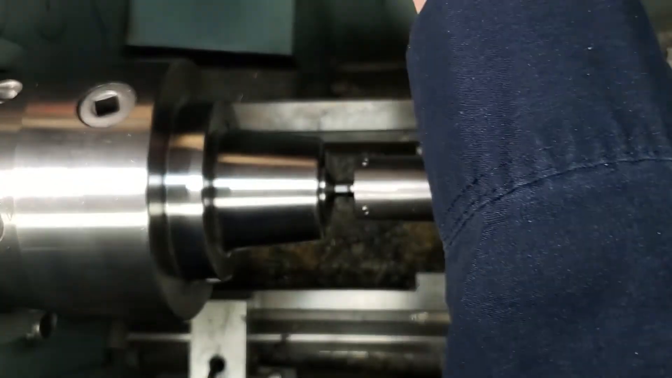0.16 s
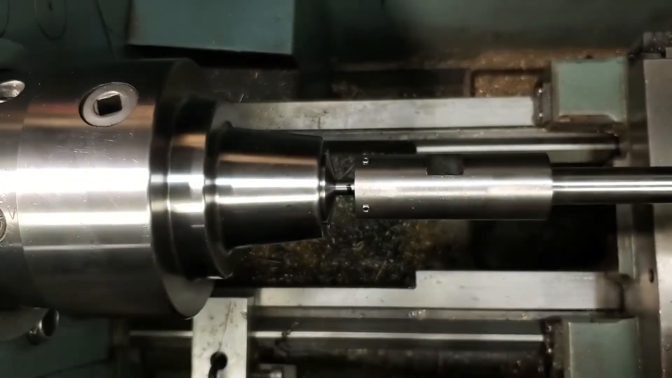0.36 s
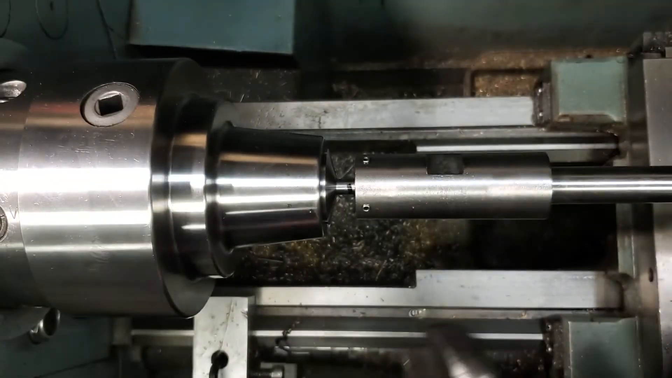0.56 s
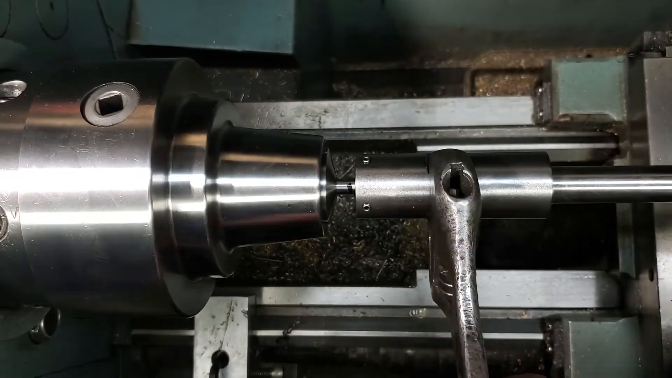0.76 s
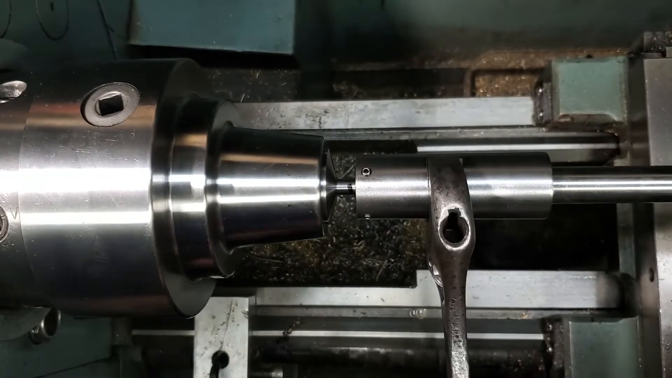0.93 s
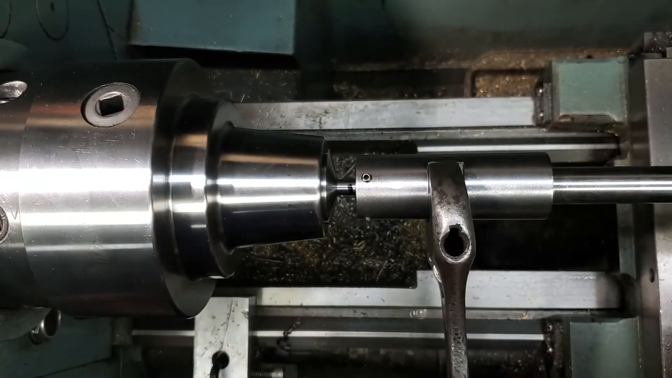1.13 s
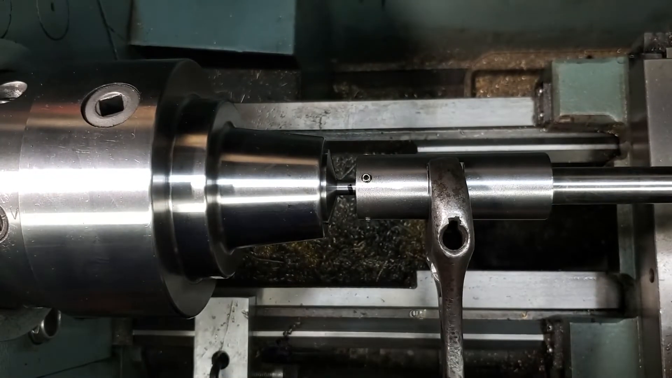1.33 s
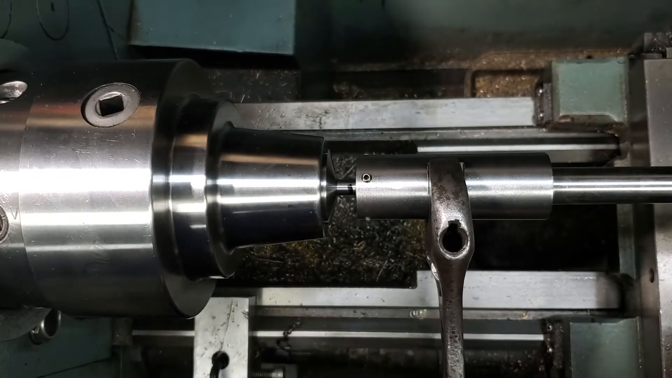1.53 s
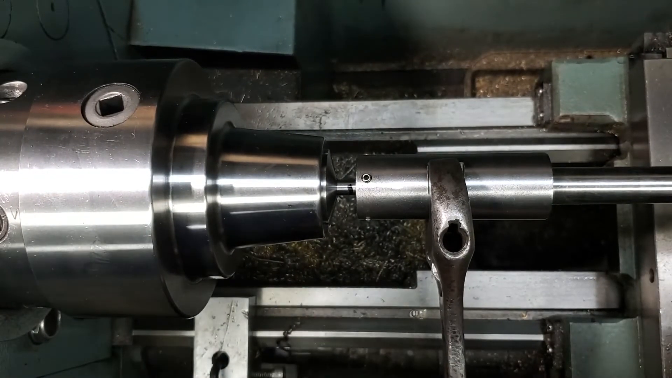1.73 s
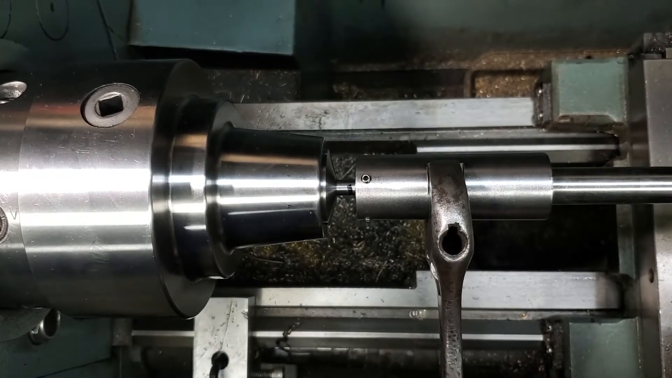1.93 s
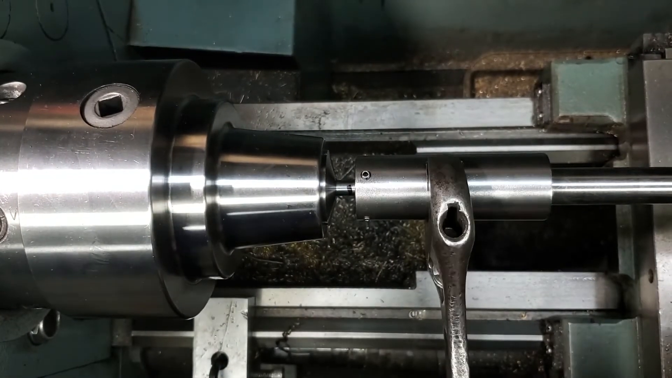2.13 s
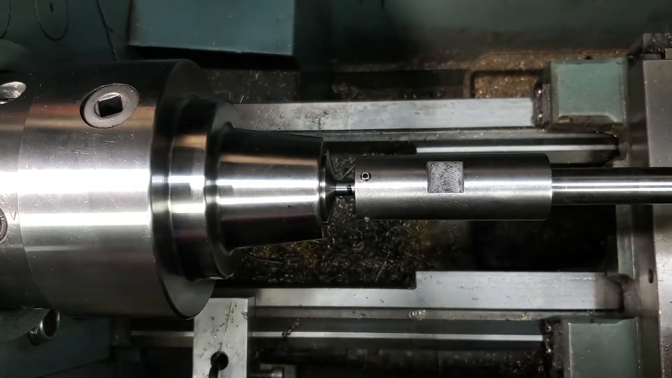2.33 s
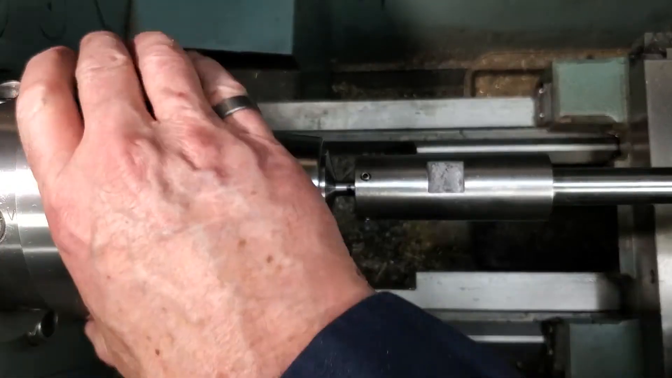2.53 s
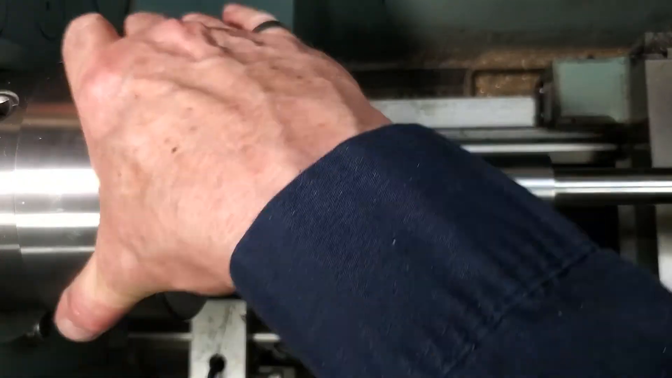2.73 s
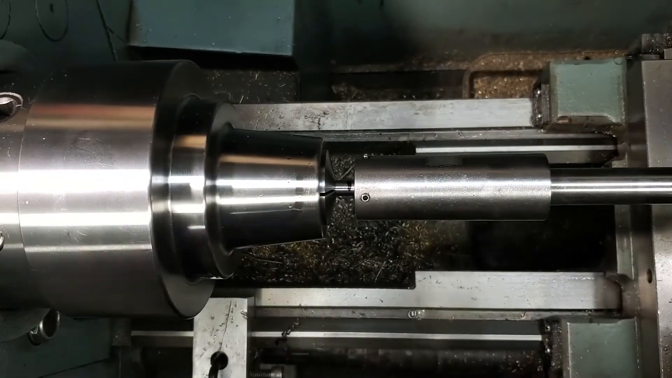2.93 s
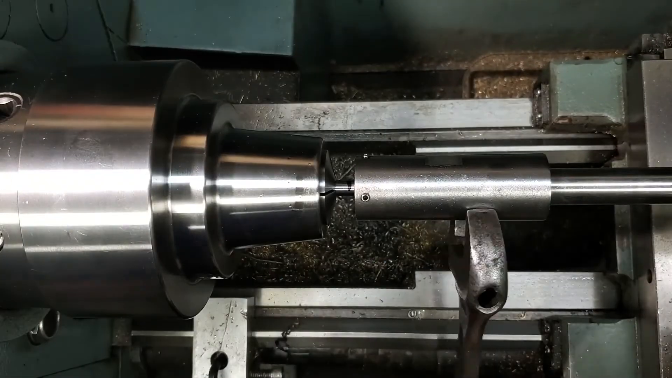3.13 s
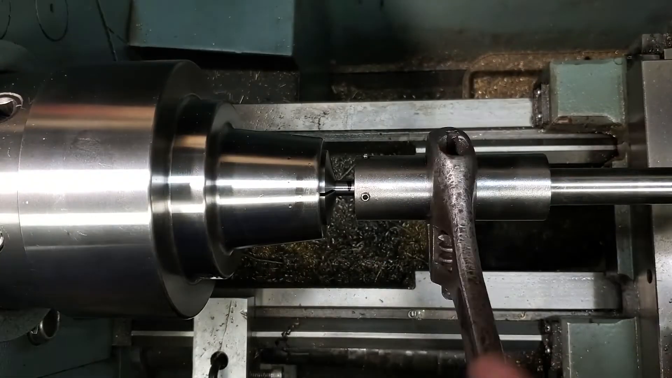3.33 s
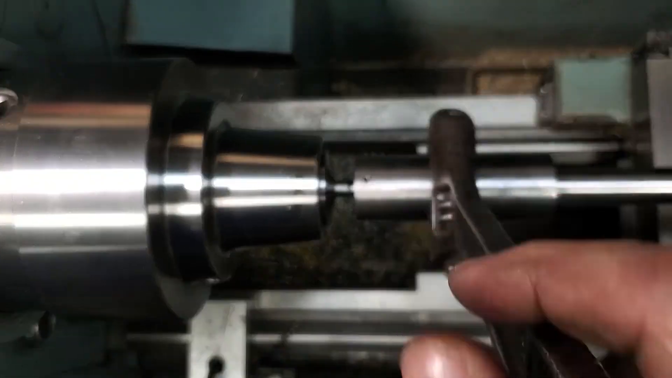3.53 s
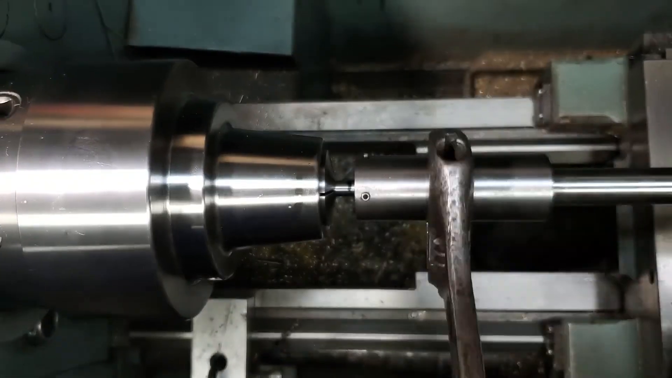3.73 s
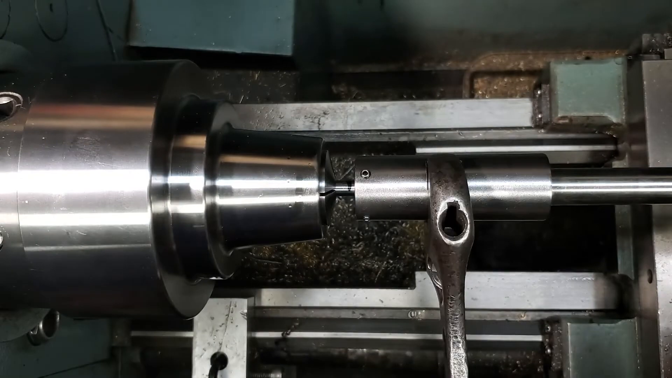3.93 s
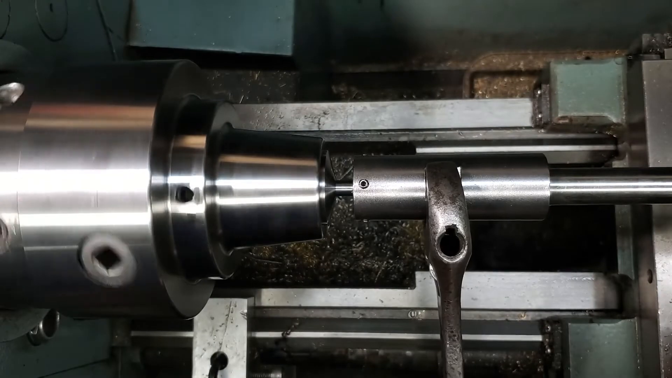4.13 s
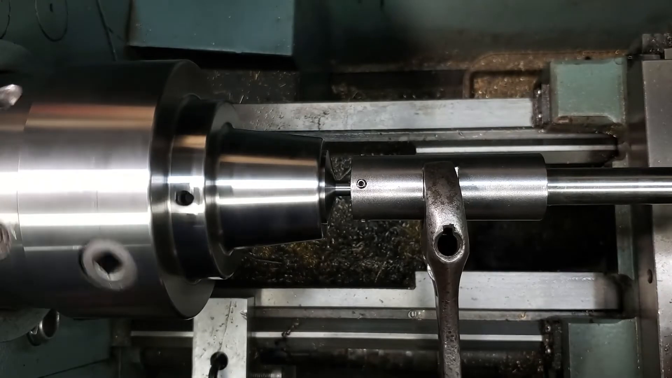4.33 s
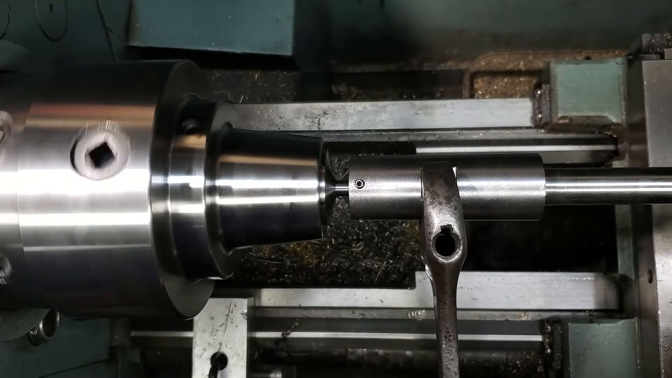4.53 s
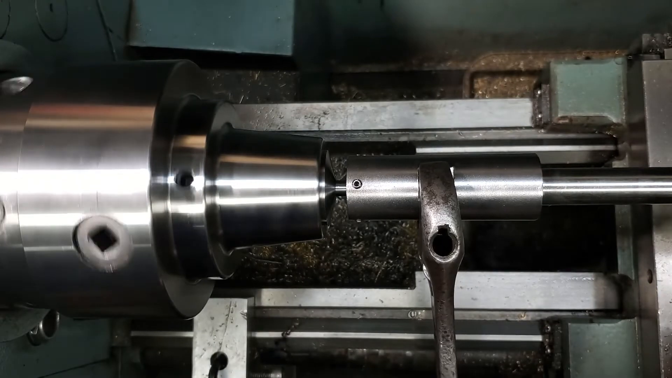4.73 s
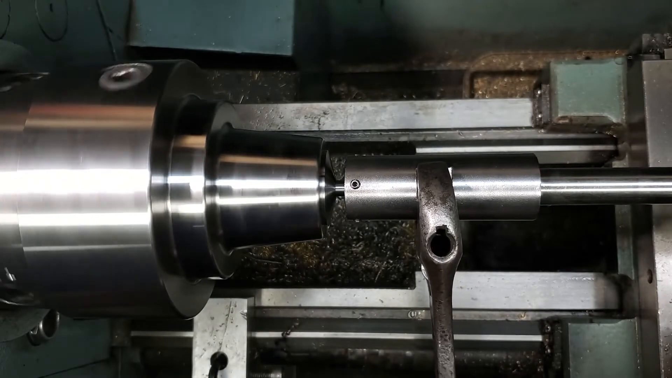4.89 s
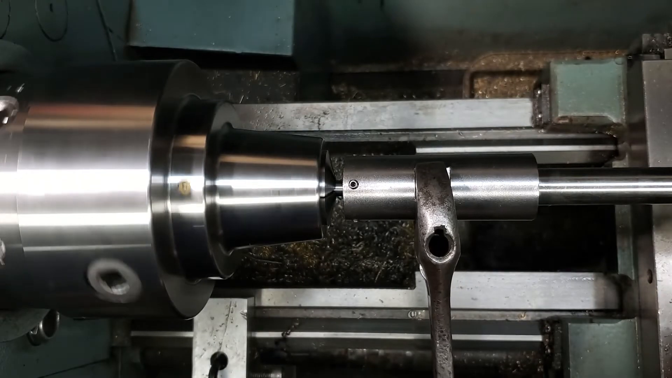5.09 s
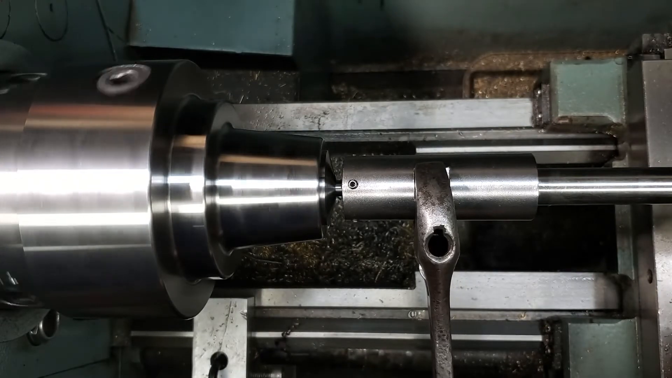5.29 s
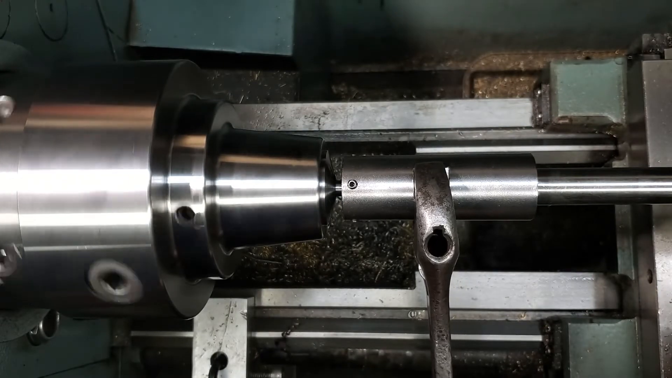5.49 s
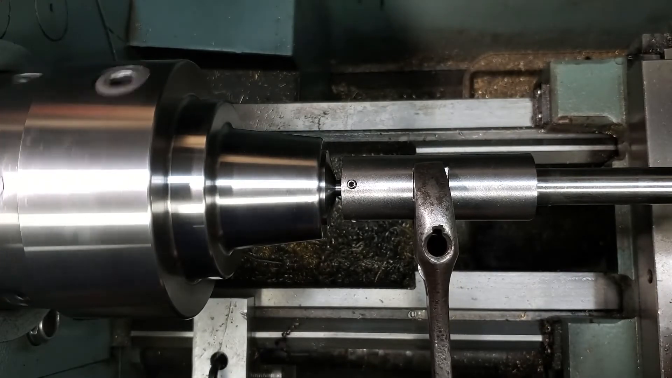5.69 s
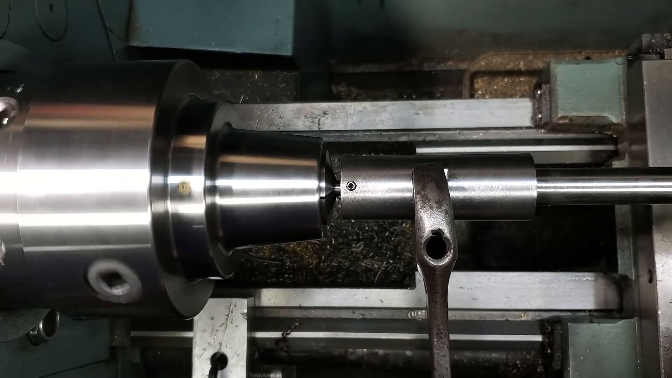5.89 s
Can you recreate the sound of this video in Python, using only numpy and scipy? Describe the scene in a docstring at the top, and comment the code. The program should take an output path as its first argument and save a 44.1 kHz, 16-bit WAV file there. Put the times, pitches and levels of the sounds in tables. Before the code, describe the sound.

In a quiet workshop, close above a metal lathe, a palm thumps the chuck, steel ticks and a wrench clinks. Levers clunk, gears knock and briefly rumble. More wrench rattles follow, then a double heavy clunk engages the drive, which spins up quickly into steady hum, gear churn and faint whine, with crackling chips. Close stereo, short room echo.

```python
"""Idling gears rub and a palm thumps the chuck of a metal lathe, heard from just above it in a workshop.
The chuck is rocked by hand, levers clunk, a wrench clinks: filtered noise bursts with decaying modes.
Then the motor is switched in: it hums in steady tones, gears whine in wavering tones and churn in noise.
The spindle spins up, layer levels following its slip, and the die's teeth crackle as they bite."""
import sys
import numpy as np
from scipy import signal
from scipy.fft import rfft, irfft
from scipy.io import wavfile
from scipy.ndimage import uniform_filter1d

SR = 44100
rng = np.random.default_rng(int(sys.argv[2]) if len(sys.argv) > 2 else 0)


def transcribe(u):
    """Save the signal u as a 16-bit wav file named by the first command-line argument.

    u: samples, shape (n,) or (channels, n), limited to [-1, 1]; the rate is SR.
    q: integer samples, one column per channel.
    """
    v = np.clip(np.atleast_2d(u).T, -1, 1)
    q = np.round(v * 32767).astype(np.int16)
    wavfile.write(sys.argv[1], SR, q)


N = 262395
TIME = np.arange(N) / SR
STROKE_ATTACK_S = 0.023
# the clutch bites, and the slip then decays with the spin-up time constant
CLUTCH_S, SPIN_UP_S = 4.18, 0.28

# resemblance of the two microphones: (frequency [Hz], left-right correlation [-1 to 1])
LIKENESS = [(60, 0.41), (290, 0.18), (640, 0.21), (1400, -0.18), (3100, 0.032), (15000, 0.039)]
# corners of a blow's tilt, from bass to treble: (frequency [Hz], ...)
ZONES_HZ = (200, 1000, 3500, 11000)
# gears rolling on after a jolt until friction stops them:
# (start [s], length [s], relative rumble level [dB], extra scrape level [dB])
COASTS = [(0.0, 0.21, -55, -6.5), (1.292, 0.52, -38, 0.5), (2.075, 0.28, -48.5, 1), (2.746, 0.2, -46.5, -6),
          (3.488, 0.17, -55.5, -20), (3.991, 0.39, -33.5, 0.5)]
# steady motor hum: (frequency [Hz], relative left level [dB], relative right level [dB])
HUM = [(120, -38, -35), (240, -39, -38), (360, -54, -52), (480, -53, -43), (720, -54, -40), (840, -38, -50)]


def amp(db):
    """Level in decibels as an amplitude ratio."""
    return 10 ** (np.asarray(db) / 20)


def unit(x):
    """Normalisation to an rms of 1."""
    return x / np.sqrt(np.mean(x ** 2) + 1e-20)


def read(points, hz):
    """A spectrum, joined by straight lines over log frequency."""
    f, value = np.transpose(points)
    return np.interp(np.log(hz + 1), np.log(f + 1), value)


def add(mix, s, sound):
    """Superposition: a sound is summed into the mix from time s."""
    part = mix[:, max(round(s * SR), 0):][:, :sound.shape[1]]
    part += sound[:, :part.shape[1]]


def bins(size):
    """Frequencies of the discrete Fourier transform."""
    return np.fft.rfftfreq(size, 1 / SR)


def bands(hz, centres):
    """Partition of the spectrum into overlapping bands that sum to one."""
    return np.array([read(list(zip(centres, row)), hz) for row in np.eye(len(centres))])


def pair(hz):
    """Partly coherent random spectra at two microphones, most alike in the bass."""
    a, b = rng.standard_normal((2, len(hz))) + 1j * rng.standard_normal((2, len(hz)))
    same = np.clip(read(LIKENESS, hz), -1, 1)
    return np.array([a, same * a + np.sqrt(1 - same ** 2) * b])


def noise(colour, peaks=(), weight=1):
    """Coloured stereo noise of rms 1, with resonant peaks (frequency [Hz], width [Hz], height [dB])."""
    hz = bins(2 * (N // 2 + 1))
    db = read(colour, hz)
    for f, width, height in peaks:
        db = db + height / (1 + (2 * (hz - f) / width) ** 2)
    return unit(irfft(pair(hz) * amp(db) * weight)[:, :N])


def wander(rate):
    """Slow random modulation of rms 1, with rate knots a second."""
    knots = rng.standard_normal(4096)
    return unit(np.interp(TIME * rate, np.arange(len(knots)), knots))


def lines(table, drift_hz, drift_rate, flutter_db):
    """Frequency and amplitude modulation of steady tones, with a phase lag between the microphones."""
    out = np.zeros((2, N))
    for hz, left_db, right_db in table:
        turns = np.cumsum(hz + drift_hz * wander(drift_rate)) / SR + rng.random()
        lag = np.arccos(np.clip(read(LIKENESS, hz), -1, 1)) * np.array([[0], [1]])
        tone = np.sqrt(2) * np.sin(2 * np.pi * turns + lag)
        out += amp([[left_db], [right_db]]) * tone * amp(flutter_db * wander(12))
    return out


def blow(s, db, hard_db, bass_db, ping_db=0):
    """Impact spectrum: hard contact tilts the treble up, weight adds bass, a loose part pings between."""
    return s, db, list(zip(ZONES_HZ, (bass_db, 0, hard_db / 2 + ping_db, hard_db)))


def blows(rows, colour, modes, contact_s, t60, pan_db, ring_db, damping, grit, ripple_db, detune=0.019):
    """Modal impact: parts chatter briefly as they meet; dense modes die fast and a few ring on."""
    out, size = np.zeros((2, N)), 2 ** 14
    t, hz, centres = np.arange(size) / SR, bins(size), np.geomspace(70, 15000, 14)
    split = bands(hz, centres)[:, None]
    knots = np.linspace(0, np.sqrt(SR / 2), 128) ** 2
    # the bass bends round to both microphones
    treble = np.minimum(hz / ZONES_HZ[1], 1)
    sides = unit(amp([[pan_db / 2], [-pan_db / 2]])) ** treble
    # heavy parts start and stop later; the faces graze before they seat
    slow = (centres[:, None, None] / ZONES_HZ[1]) ** -damping
    rise = contact_s * (1 + slow)
    swell = np.minimum(t / rise, 1) ** 3 * amp(-60 * np.maximum(t - rise, 0) / (t60 * slow))
    mode_rise = 2 * contact_s
    for s, db, tilt in rows:
        # each point of contact favours other high modes
        ripple = np.interp(hz, knots, 2 * rng.random(len(knots)) - 1) * treble
        shape = split * sides * amp(read(colour, hz) + read(tilt, hz) + ripple_db * ripple)
        # the bouncing settles as the blow dies
        bounces = np.interp(t, t[::64], rng.standard_normal(size // 64))
        chatter = amp(grit * bounces * np.exp(-t / t60))
        body = irfft(pair(hz) * shape) * swell * chatter
        # each band keeps the energy its colour asks for
        body *= np.sqrt((shape ** 2).mean(2, keepdims=True) / (body ** 2).sum(2, keepdims=True))
        sound = body.sum(0)
        chances = 2 * rng.random((len(modes), 3)) - 1
        for (f, mode_db, life), (off, left, right) in zip(modes, chances):
            decay = amp(-60 * np.maximum(t - mode_rise, 0) / life)
            fade = np.minimum(t / mode_rise, 1) ** 3 * decay
            # low modes reach both microphones in step
            apart = min(f / ZONES_HZ[1], 1) * right
            phase = np.pi * np.array([[left], [left + apart]])
            tone = np.sin(2 * np.pi * f * (1 + detune * off) * t + phase)
            gain = amp(ring_db + mode_db + read(tilt, f)) * sides[:, [np.searchsorted(hz, f)]]
            sound += gain * 2 * tone * fade / fade.sum()
        add(out, s - contact_s, amp(db) * sound)
    return out


def still_air():
    """Stationary background noise: the still workshop air."""
    # colour of the workshop air: (frequency [Hz], relative level [dB])
    air_colour = [(15, -34), (25, -1), (76, 5.5), (175, -16), (236, -1), (1100, -14), (3250, -19.5),
                  (6210, -26), (14800, -19.5), (16000, -15)]
    return amp(-66.5) * noise(air_colour)


def room(x):
    """Diffuse reverberation by convolution, each band decaying exponentially at its own speed."""
    # reverberation of the workshop: (frequency [Hz], decay by 60 dB [s])
    decays = [(100, 0.17), (300, 0.69), (900, 0.43), (3000, 0.19), (7000, 0.42), (15000, 1)]
    t, (centres, t60) = TIME[:SR], np.transpose(decays)
    parts = irfft(rfft(rng.standard_normal((2, SR))) * bands(bins(SR), centres)[:, None])
    tail = (parts * amp(-60 * t / t60[:, None, None])).sum(0)
    tail *= np.minimum(t / 0.0067, 1)  # onset [s]
    return signal.fftconvolve(x, tail / np.linalg.norm(tail[0]), axes=1)[:, :N]


def rolling(scraping):
    """Friction braking: idling gears, as rumble or scrape, fall evenly to nothing after each jolt."""
    return sum(amp(db + scraping * scrape_db) * np.interp(TIME - s, (0, STROKE_ATTACK_S, length), (0, 1, 0))
               for s, length, db, scrape_db in COASTS)


def strokes(table, release_s=0.03):
    """Contact pressure of rubbing strokes: attack, hold, release."""
    pressure = np.zeros(N)
    for s, length, db in table:
        attack, release = (TIME - s) / STROKE_ATTACK_S, (s + length - TIME) / release_s
        pressure += amp(db) * np.clip(np.minimum(attack, release), 0, 1)
    return pressure


def patchy(x, patch_db):
    """Time-varying filtering: shifting contact favours now one resonance, now another."""
    z = signal.stft(x, nperseg=1024, noverlap=768)[2]
    patches = rng.standard_normal(z.shape[1:])
    for axis in (0, 1):
        patches = uniform_filter1d(patches, size=5, axis=axis)
    return signal.istft(z * amp(patch_db * unit(patches)), nperseg=1024, noverlap=768)[1][:, :N]


def handling(grain_db=1.5, catch_db=2):
    """Friction noise: sliding hand, steel and idling gears catch unevenly and stir the casting."""
    # wrench sliding over steel: (start [s], length [s], relative level [dB])
    slide_times = [(0.68, 0.35, -57.5), (1.0, 0.23, -64), (3.07, 0.21, -61.5), (3.255, 0.079, -45.5)]
    # sleeve and hand brushing past: (start [s], length [s], relative level [dB])
    rustle_times = [(0.28, 0.13, -63), (0.43, 0.14, -66), (1.88, 0.069, -61), (2.05, 0.47, -66.5),
                    (2.88, 0.13, -63), (3.39, 0.16, -72.5), (3.81, 0.059, -63)]
    # spectrum of the rubbing: (frequency [Hz], relative level [dB])
    rub_colour = [(18, -27), (30, -0.5), (86, -0.5), (153, 4.5), (311, -3), (449, 5.5), (569, -2.5),
                  (822, 3.5), (1430, -5.5), (1720, -3.5), (2410, -12), (3060, -12.5), (6550, -25),
                  (16000, -27)]
    # weights of rolling gears, sliding steel and brushing sleeve: (rumble [dB], scrape [dB], hiss [dB])
    coast_db = (0, -10.5, -27)
    slide_db = (0, -1.8, -12)
    rustle_db = (-8.5, -3.2, 0)
    casting_peaks = [(145.4, 14, 12), (240, 25, 3.2), (838, 90, 6.1)]
    out, slide, rustle = np.zeros((2, N)), strokes(slide_times), strokes(rustle_times)
    for k, zone in enumerate(bands(bins(2 * (N // 2 + 1)), (1100, 3000, 7000))):
        pressure = amp(coast_db[k]) * rolling(k > 0)
        pressure += amp(slide_db[k]) * slide + amp(rustle_db[k]) * rustle
        out += pressure * noise(rub_colour, casting_peaks, zone) * amp(catch_db * wander(60))
    return out * amp(grain_db * wander(240))


def palm_thumps():
    """Soft impact: a palm stops the chuck."""
    # blows of the palm: (time [s], strength [dB], hardness [dB], extra bass [dB])
    hits = [(0.135, 27, -2.5, 4.5), (0.151, 25.5, -9, -4)]
    # spectrum of a thump: (frequency [Hz], relative level [dB])
    colour = [(30, -19), (100, -12.5), (190, -15.5), (300, -3.5), (430, -4.5), (600, -12.5), (1100, -25),
              (1900, -24), (3600, -44), (5500, -24), (7000, -37.5), (15500, -38.5)]
    # ringing modes: (frequency [Hz], relative level [dB], decay by 60 dB [s])
    modes = [(299.5, 0.87, 0.022), (394, -2, 0.05)]
    return blows([blow(*row) for row in hits], colour, modes, contact_s=0.0046, t60=0.046,
                 pan_db=-0.5, ring_db=-3.0, damping=0.027, grit=2.5, ripple_db=4.5)


def ring_taps():
    """Light, hard impact: a finger ring meets the chuck and excites high modes."""
    # taps: (time [s], strength [dB], hardness [dB], extra bass [dB])
    hits = [(2.572, 5, 4.5, 1.5), (2.679, 7, -5.5, 21)]
    # spectrum of a tap: (frequency [Hz], relative level [dB])
    colour = [(30, -28), (300, -21), (1500, -20.5), (2600, -26), (3900, -14), (4600, -15.5), (5400, -9),
              (7000, -15.5), (9500, -15), (11800, -20.5), (13300, -4.5), (15500, -10)]
    # modes of the finger ring: (frequency [Hz], relative level [dB], decay by 60 dB [s])
    modes = [(13400, 0.5, 0.027), (12400, 1.5, .03), (14300, -7.5, .03), (15140, -4, .03)]
    return blows([blow(*row) for row in hits], colour, modes, contact_s=0.0028, t60=0.055,
                 pan_db=2.5, ring_db=0.5, damping=.05, grit=1.7, ripple_db=2.5)


def steel_ticks(bass_db=-4.5):
    """Hard impact: small steel contacts make the die holder ring."""
    # contacts: (time [s], strength [dB], hardness [dB], ping [dB])
    hits = [(0.029, -3, -8, -0.5), (0.124, 8, -4.5, -11.5), (0.346, -10.5, -6, -1.5),
            (0.542, -15.5, 7.5, 8), (0.717, 13.5, 3, 2.5), (0.957, 1, -1.5, 0), (1.193, -14.5, 8, -11.5),
            (1.656, 13, -5.5, 9), (1.975, -12.5, 16.5, -2), (2.071, -10, 18, -2), (2.161, -2, 8, -7.5),
            (2.267, 3, -8, 6.5), (2.383, -10, 9, 6), (3.512, 17, -5.5, -1.5), (4.881, -7, 2.5, -15),
            (5.911, 21.5, -9.5, -1)]
    # spectrum of a tick: (frequency [Hz], relative level [dB])
    colour = [(30, -13), (180, -5.5), (500, -6.5), (900, -10), (1800, -9), (3200, -12.5), (4400, -12.5),
              (5400, -9), (6600, -13), (9000, -12), (11500, -12.5), (13500, -9.5), (15500, -16)]
    # modes of the die holder: (frequency [Hz], relative level [dB], decay by 60 dB [s])
    modes = [(2905, 1, 0.037), (3343, -2.5, 0.054), (5560, -7, 0.058), (6030, -7, 0.024), (9020, -7, 0.023)]
    rows = [blow(s, db, hard, bass_db, ping) for s, db, hard, ping in hits]
    return blows(rows, colour, modes, contact_s=0.0034, t60=0.057,
                 pan_db=-0.7, ring_db=-3, damping=0.032, grit=1.3, ripple_db=4.0)


def wrench_clinks(bass_db=-4):
    """Modal ringing of a wrench struck on the holder and the bed."""
    # clinks: (time [s], strength [dB], hardness [dB], ping [dB])
    hits = [(0.679, 12, -9, -3.5), (0.733, 13, -24, 1), (0.807, 6.5, -25, -1), (0.841, 8, -16, 3),
            (0.886, 6, 0, -4.5), (0.913, 1, -7, -2), (2.771, 14.5, 14, -5.5), (2.909, -9, 14, -3),
            (3.053, 10, 3.5, -4.5), (3.08, -8.5, -6.5, 10.5), (3.106, 13.5, 7, -3),
            (3.142, 12.5, -5.5, -0.5), (3.151, 13.5, 2, -2.5), (3.323, 9, -16, 14.5), (3.352, 19, -8, 12),
            (3.374, 0.5, -24.5, -0.5)]
    # spectrum of a clink: (frequency [Hz], relative level [dB])
    colour = [(30, -20), (170, 0), (500, -5.5), (1100, -20.5), (1700, -16), (2400, -13.5), (3250, -10.5),
              (4100, -23), (5100, -12), (6300, -36), (7400, -19), (11500, -30), (15500, -37)]
    # modes of the wrench: (frequency [Hz], relative level [dB], decay by 60 dB [s])
    modes = [(1620, -5, .04), (3180, -2, .03), (3300, -2, .028), (3420, -2, .03), (5180, -5, .04),
             (7250, -6, .025), (10050, -11, .02), (11950, -9, .022)]
    rows = [blow(s, db, hard, bass_db, ping) for s, db, hard, ping in hits]
    return blows(rows, colour, modes, contact_s=0.004, t60=0.064,
                 pan_db=-1.5, ring_db=-6, damping=0.42, grit=2, ripple_db=9)


def gear_knocks(count=7, bass_db=4.5):
    """Backlash impacts: teeth take up their play and rebound once; stray teeth knock in the longest roll."""
    # knocks: (time [s], strength [dB])
    knock_times = [(0.268, -6), (0.722, 3.5), (0.886, 8.5), (1.028, 0.5), (1.797, 20), (2.013, 16),
                   (2.104, 27), (2.193, 26.5), (2.616, 20), (3.679, -2.5), (5.916, 21)]
    # spectrum of a knock: (frequency [Hz], relative level [dB])
    colour = [(30, -32.5), (80, -7), (160, -7), (320, -2.5), (550, -17), (800, -15), (1150, -18.5),
              (1650, -9.5), (2400, -22.5), (3300, -20), (5000, -32.5), (7000, -46), (15500, -55)]
    # modes of the gears: (frequency [Hz], relative level [dB], decay by 60 dB [s])
    modes = [(215.6, 2.5, 0.53), (296, -7.5, 0.24), (749, 0.5, 0.066), (1738, -34, 0.017),
             (3280, -7.5, 0.024)]
    rebound_s, rebound_db = 0.033, -19
    stray_db, scatter_db = 40, 1  # strength above the roll, random spread
    start, length, roll_db, _ = max(COASTS, key=lambda row: row[1])
    parts = (np.arange(count) + rng.random(count)) / (count + 1)
    # stray knocks weaken as the roll slows
    strengths = roll_db + stray_db + scatter_db * rng.standard_normal(count) + 20 * np.log10(1 - parts)
    hits = list(knock_times) + [(s + rebound_s, db + rebound_db) for s, db in knock_times]
    hits += list(zip(start + length * parts, strengths))
    # hardness rises dB for dB with strength above 20 dB: soft knocks are dull
    rows = [blow(s, db, db - 20, bass_db) for s, db in hits]
    return blows(rows, colour, modes, contact_s=0.004, t60=0.078,
                 pan_db=0, ring_db=-6.5, damping=0.2, grit=1.0, ripple_db=4.5)


def headstock_clunks():
    """Heavy impact: levers and clutch slam home in the headstock, each in a few quick blows."""
    # blows: (time [s], strength [dB], hardness [dB], extra bass [dB], ping [dB])
    hits = [(1.263, 25, 12, 7.5, -6), (1.272, 32.5, -8.5, 0, -1), (1.279, 33, -9.5, 6.5, 0.5),
            (1.294, 24.5, 13, 3.5, -5), (2.698, 28, -19, -7.5, -1.5), (2.732, 29.5, 12.5, 0.5, 3.5),
            (2.741, 23, 6, 7.5, -6), (3.972, 27, 10.5, 3.5, -7.5), (3.984, 30.5, -13, 1, -3),
            (3.996, 24.5, 15.5, 8, -2.5), (4.012, 15, 18.5, -13, -2), (4.168, 32.5, -2.5, -1, -3.5),
            (4.186, 25, -3, 13.5, -1)]
    # spectrum of a clunk: (frequency [Hz], relative level [dB])
    colour = [(30, -9), (80, -20), (140, -6.5), (300, -5), (550, -14), (820, -10.5), (1100, -12),
              (2200, -20), (3300, -21.5), (4400, -29), (5700, -31.5), (7500, -37.5), (15500, -46.5)]
    # modes of the casting: (frequency [Hz], relative level [dB], decay by 60 dB [s])
    modes = [(139, 1, .1), (220, -30.5, 0.77), (292, -5.5, 0.045), (385.7, -3, 0.1), (808.4, -4, 0.035),
             (1190, -12.5, 0.046)]
    return blows([blow(*row) for row in hits], colour, modes, contact_s=0.0045, t60=0.084,
                 pan_db=-0.4, ring_db=-2.5, damping=0.2, grit=2.8, ripple_db=2.5)


def spinning(full_db, slow_db):
    """Exponential spin-up: gain starts slow_db away from full_db and closes on it as the slip decays."""
    slip = np.exp(-np.maximum(TIME - CLUTCH_S, 0) / SPIN_UP_S)
    return amp(full_db + slow_db * slip)


def bed_shudder():
    """Forced vibration: the bed shakes more and more until the speed settles."""
    # spectrum of the shaking: (frequency [Hz], relative level [dB])
    shake_colour = [(15, -9), (35, 0), (60, -9), (100, -12), (200, -44)]
    settled_s, fade_s, peak_db, rise_db_per_s = 5.13, 0.08, -40, 17
    unsettled_s = np.maximum(settled_s - TIME, 0)
    shudder = amp(peak_db - rise_db_per_s * unsettled_s) * np.minimum(unsettled_s / fade_s, 1)
    return shudder * noise(shake_colour)


def belt_rumble():
    """Low-frequency broadband noise of the belt, growing with speed."""
    # spectrum of the belt: (frequency [Hz], relative level [dB])
    belt_colour = [(25, -47), (50, -27), (72, -10.5), (92, -12.5), (120, -9), (146, -3.5), (172, -10.5),
                   (215, -5.5), (265, -10.5), (330, -16), (420, -25.5), (600, -54)]
    return spinning(full_db=-31.5, slow_db=-9.5) * noise(belt_colour)


def gear_churn(mesh_db=0.5, throb=0.062):
    """Modulated noise: teeth churn in a resonant housing; a hiss, loudest at the grip, sinks to a steady level."""
    # spectrum of the churning teeth: (frequency [Hz], relative level [dB])
    churn_colour = [(250, -19), (400, -3.5), (550, -3.5), (680, 3), (880, 4), (1100, -4), (1500, -4.5),
                    (2200, -9.5), (3400, -11.5), (4200, -18), (5500, -28), (9000, -37)]
    # spectrum of the hiss: (frequency [Hz], relative level [dB])
    hiss_colour = [(2500, 6.5), (5000, 5), (7000, -4.5), (9000, -0.5), (11000, -20), (16000, -20)]
    # resonances of the housing: (frequency [Hz], width [Hz], height [dB])
    housing = [(1299, 87, 11.5), (1940, 17, 11.5), (2417, 18, 11), (3060, 22, 6.5), (3190, 21, 8),
               (3544, 11, 15)]
    churn = spinning(full_db=-31.0, slow_db=-5) * noise(churn_colour, housing)
    hiss = spinning(full_db=-50.5, slow_db=9) * noise(hiss_colour)
    # the teeth throb at the lowest hum frequency
    teeth = amp(mesh_db * wander(260)) * (1 + throb * np.sin(2 * np.pi * HUM[0][0] * TIME))
    return teeth * (churn + hiss)


def gear_whine():
    """Tonal gear noise: lines of wavering pitch that grow with speed."""
    # gear whine: (frequency [Hz], relative left level [dB], relative right level [dB])
    whine_lines = [(147, -39, -39), (466, -51, -51), (652, -49, -49), (780, -47, -55), (878, -55, -49),
                   (1190, -48, -48), (1314, -55, -55), (1724, -56, -56), (2086, -63, -53)]
    tones = lines(whine_lines, drift_hz=4.81, drift_rate=35, flutter_db=5.0)
    return spinning(full_db=2.5, slow_db=-7.5) * tones


def motor_hum():
    """Harmonic mains hum, weak until the clutch bites."""
    tones = lines(HUM, drift_hz=0.73, drift_rate=10, flutter_db=1.5)
    return spinning(full_db=2.5, slow_db=-16.5) * tones


def drive(motor_on_s=3.97, motor_rise_s=0.053, grip_s=0.025):
    """Power transmission: the motor hums once switched in; the gear train sounds once the clutch grips."""
    powered = np.clip((TIME - motor_on_s) / motor_rise_s, 0, 1)
    engaged = np.clip((TIME - CLUTCH_S) / grip_s, 0, 1)
    return powered * motor_hum() + engaged * (belt_rumble() + bed_shudder() + gear_churn() + gear_whine())


def chips(bite_db=-16, cut_db=-21, uneven_db=4.5, t60=0.035):
    """Pulse train of brittle fracture: chips snap off, thick and fast in the bite, then almost evenly."""
    bite_s, bite_length_s = 4.2, 0.36
    bite_per_s, cut_per_s = 22, 3.8  # nominal rates, before the unevenness
    biting = TIME < bite_s + bite_length_s
    rate = (TIME > bite_s) * np.where(biting, bite_per_s, cut_per_s)
    broken = np.floor(np.cumsum(rate * amp(uneven_db * wander(40))) / SR)
    strength_db = np.where(biting, bite_db, cut_db) + 2 * rng.standard_normal(N)
    snaps = np.diff(broken, prepend=0) * amp(strength_db)
    t = np.arange(2048) / SR
    tick = rng.standard_normal((2, len(t))) * amp(-60 * t / t60)
    band = signal.butter(1, [4200, 11000], "band", fs=SR, output="sos")
    tick = signal.sosfilt(band, tick / np.linalg.norm(tick[0]))
    return signal.oaconvolve(snaps[None], tick, axes=1)[:, :N]


def scene():
    """Superposition of close blows, their echo in the shop, rubbing, and the running machine."""
    thumps, taps, ticks = palm_thumps(), ring_taps(), steel_ticks()
    clinks, knocks, clunks = wrench_clinks(), gear_knocks(), headstock_clunks()
    echo = room(amp(-20) * clunks + amp(-21.5) * knocks + amp(-34.5) * (ticks + taps) + amp(-45) * clinks)
    steel = thumps + clunks + knocks + ticks + taps + clinks
    rubbing = amp(-0.5) * patchy(handling(), patch_db=3.5)
    return still_air() + echo + rubbing + steel + drive() + chips()


def record(dry, low_cut_hz=28, edge_hz=16050):
    """Band limiting: a high-pass rolls off the deep bass and a low-pass ends the treble."""
    thinned = signal.sosfilt(signal.butter(2, low_cut_hz, "high", fs=SR, output="sos"), dry)
    low_pass = signal.firwin(401, edge_hz, window=("kaiser", 8), fs=SR)
    return signal.oaconvolve(thinned, low_pass[None], "same")


dry = scene()
out = record(dry)
transcribe(out)
```